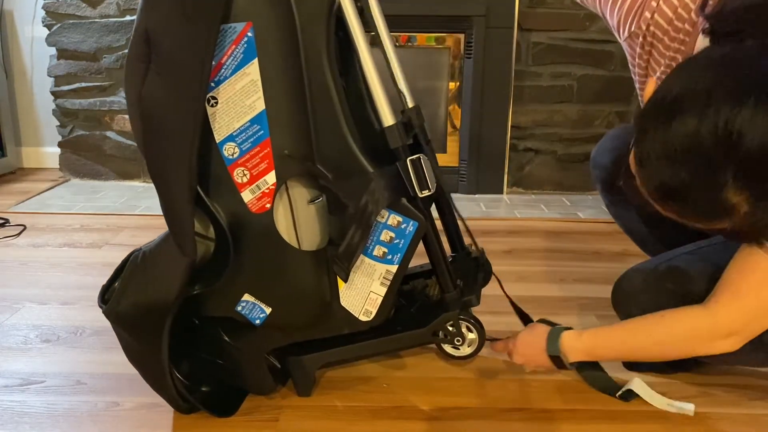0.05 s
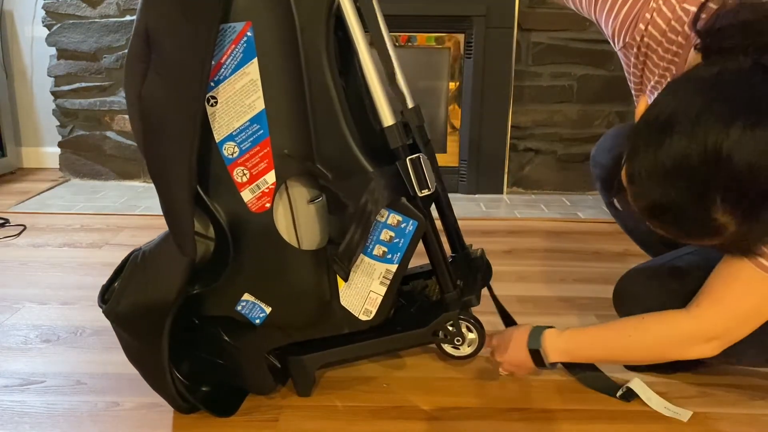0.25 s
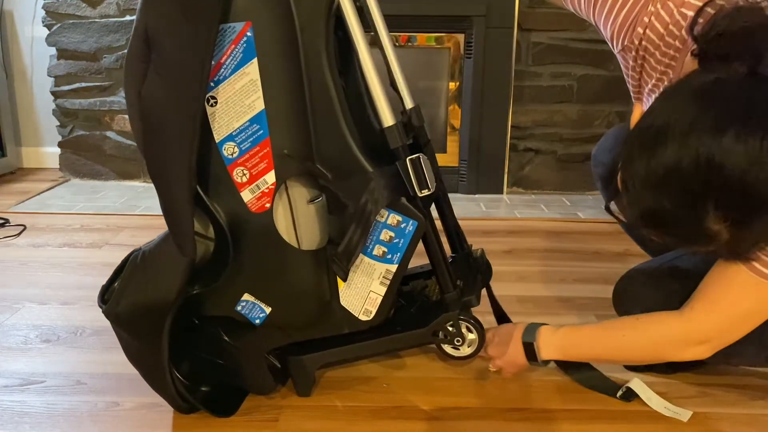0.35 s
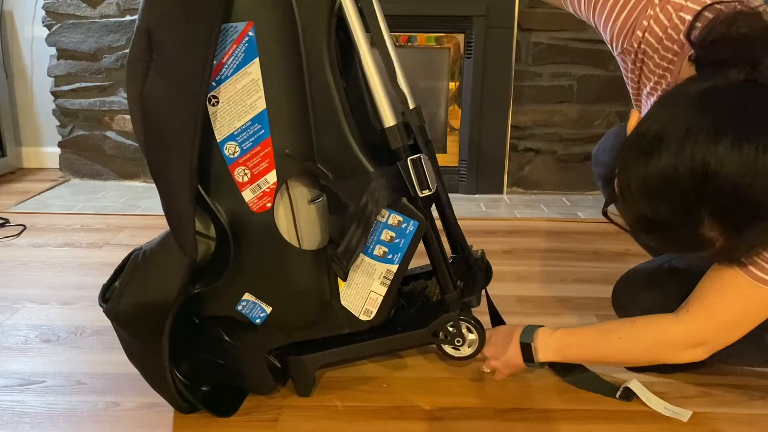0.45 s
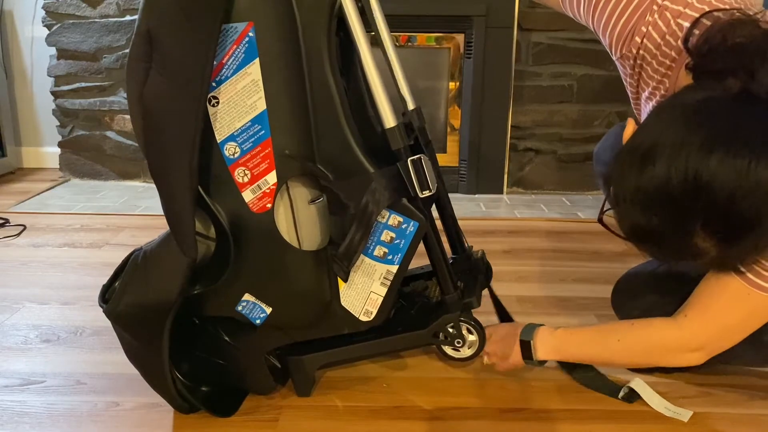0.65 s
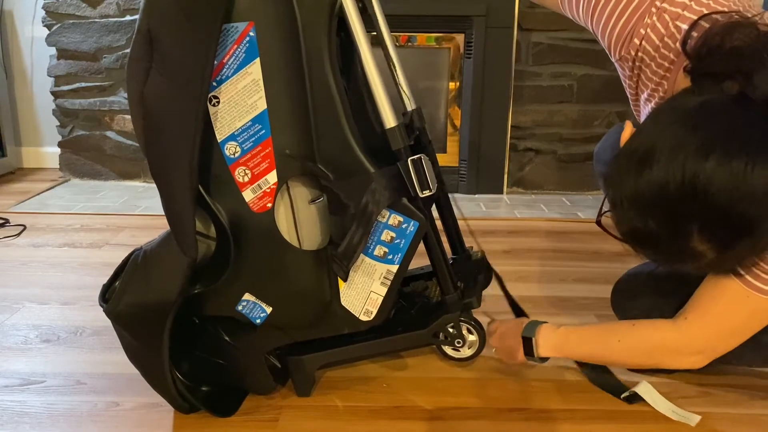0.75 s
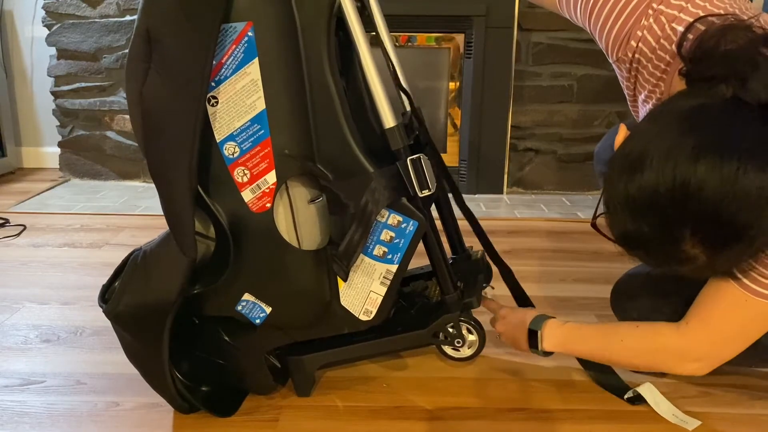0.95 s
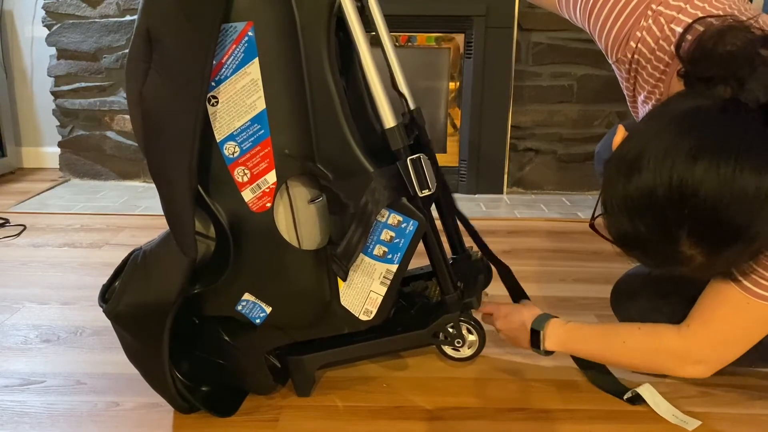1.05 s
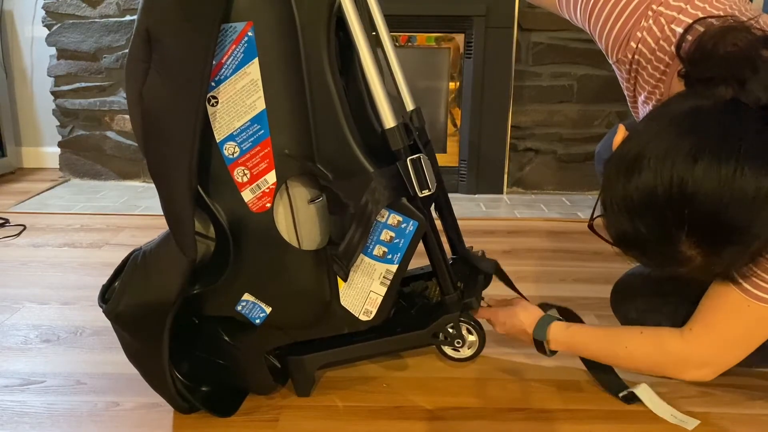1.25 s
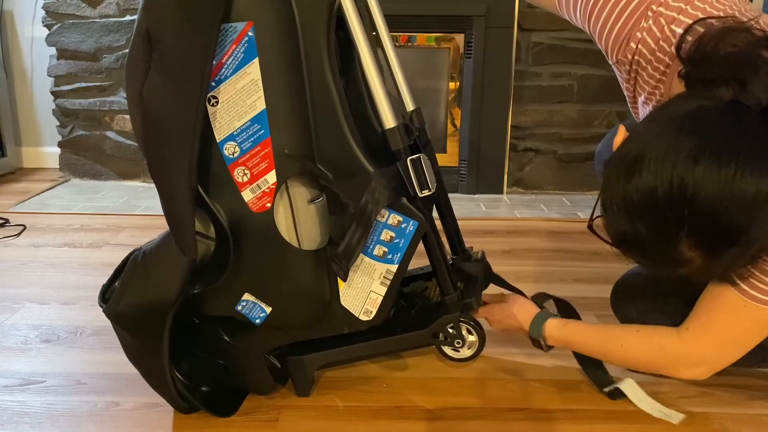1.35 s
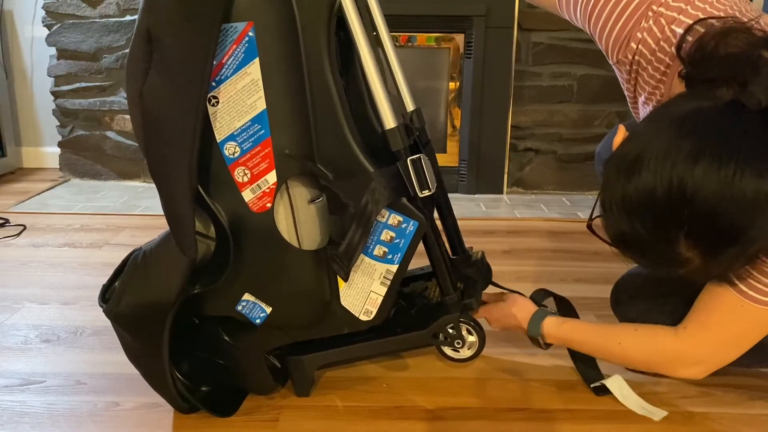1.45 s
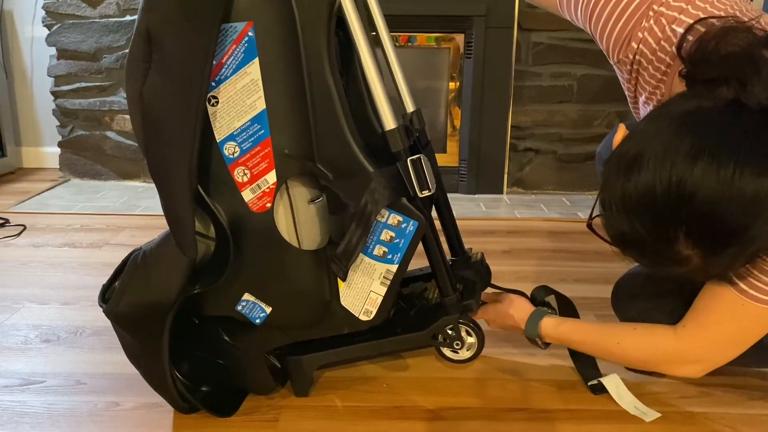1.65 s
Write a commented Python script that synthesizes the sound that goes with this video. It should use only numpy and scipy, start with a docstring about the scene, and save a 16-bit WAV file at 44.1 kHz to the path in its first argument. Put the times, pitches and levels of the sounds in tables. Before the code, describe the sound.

A metal strap connector clicks and knocks on a small cart's axle and frame. A tiny tick at 0.09 s precedes a loud, bright clatter at 0.24-0.29 s; faint strap rustle and a soft tap follow around 0.5, a lighter click at 0.63, weak scrapy ticks at 0.94-1.04, then a firm double clack at 1.24 and 1.28. Wooden-floored room echoes and low rumble linger.

```python
"""A live room with a wooden floor: a metal strap connector is hooked on the axle of a small cart.
The connector clicks brightly and the frame knocks lower, both as struck banks of damped modes; tubes ring on.
The webbing rustles in the hand as grainy noise around a wandering pitch.
Floor and walls answer every contact with echoes and a noise tail; the house rumbles faintly as shaped noise."""
import sys
import numpy as np
from scipy import signal
from scipy.fft import rfft, irfft, next_fast_len
from scipy.io import wavfile
from scipy.ndimage import uniform_filter1d

SR = 44100
rng = np.random.default_rng(int(sys.argv[2]) if len(sys.argv) > 2 else 0)


def attenuation_scalar(level_db):
    """Turn a level in dB into a linear amplitude multiplier (20 dB per decade)."""
    decades = np.asarray(level_db, float) / 20
    return 10 ** decades


def to_wav(sig):
    """Store sig (one row per channel, or 1-D mono) as 16-bit WAV at the path in sys.argv[1].

    Samples outside -1..1 are clipped; the rate is SR.
    """
    pcm = np.clip(np.atleast_2d(sig), -1, 1) * 32767
    pcm = np.round(pcm).astype(np.int16)
    wavfile.write(sys.argv[1], SR, pcm.T)  # frames by channels


N = 74970  # length in samples

# webbing rustle over time: start_s, level_db, centre_hz
RUSTLE_PATH = [(0, -72.5, 5470), (.2, -83.5, 4670), (.45, -64.5, 2390), (.54, -65.5, 2450),
               (.62, -72, 3000), (.75, -77.5, 4000), (.92, -78, 3800), (.945, -68, 3500),
               (.966, -53.5, 3540), (1.07, -117, 5100), (1.2, -80.5, 5000), (1.45, -67, 3000),
               (1.7, -100, 3000)]
# broad skirt under the rustle's hump: pitch_hz, level_db
RUSTLE_SKIRT = [(300, 23), (1000, 19.5), (3000, 11), (6000, -3.5), (10000, -25.5), (15000, -8.5)]
RUSTLE_OCTAVES, RUSTLE_SKIRT_DB = 0.99, -15.5  # the hump is 6 dB down this far from its centre
GRAINS_PER_S, GRAIN_DB = 7600, -2  # mean rate; scale of the random spread in grain level

# steady rumble and hiss of the house: pitch_hz, relative_level_db_per_hz
HOUSE_SPECTRUM = [(24, -10), (40, 0.5), (76, 3), (233, -8), (527, -22.5), (845, -19.5), (1320, -48.5),
                  (1650, -44), (2990, -51), (6300, -49), (15000, -57)]
HOUSE_DB = -62  # rms ahead of the microphone

# connector clicks: start_s, level_db, best_pitch_hz, spread_octaves, room_send_db
CLICK_HITS = [(.0882, -52, 8760, 0.42, -20), (.2386, -34.5, 9000, 0.45, -1.5),
              (.2396, -43, 14000, 0.27, -23), (.2462, -47, 9900, 0.49, 3), (.2548, -35, 13500, 0.54, -13),
              (.2570, -39, 2900, .4, -5.5), (.2390, -28, 5130, 0.4, -4.5), (.2396, -31, 2810, 0.3, -3),
              (.2545, -34, 3300, 0.46, -2), (.2620, -38, 5480, 0.36, 5.5), (.2630, -36, 2580, 0.47, -11),
              (.2920, -42, 2410, 0.11, -4.5), (.5087, -51.5, 2450, 0.07, 3.5),
              (.6310, -37.5, 3980, 0.23, -0.5), (.6302, -43.5, 7100, 0.55, -6.5),
              (.6395, -56, 3900, 0.25, -7), (.6342, -48.5, 3850, 0.3, -2.5), (.9398, -50.5, 3230, 0.7, -4),
              (.9600, -60.5, 3730, 0.57, 1), (.9630, -68, 5500, 1.1, 11.5), (.9665, -57, 2650, 0.77, -22),
              (1.0290, -65, 4620, 0.83, 10), (1.0400, -50, 10800, 0.55, -8.5),
              (1.0405, -51, 4970, 0.16, -1.5), (1.2410, -42.5, 10000, 1, -0.5),
              (1.2406, -31.5, 3150, 0.32, -6), (1.2409, -29, 5110, 0.13, -4), (1.2432, -41, 3380, .4, -6.5),
              (1.2828, -44, 3800, 0.65, 1)]
# frame knocks: start_s, level_db, best_pitch_hz, spread_octaves, room_send_db
KNOCK_HITS = [(.2398, -35.5, 1780, 0.32, -2), (.2430, -31, 1350, 0.36, -6), (.2450, -37.5, 453, 0.75, -7.5),
              (.2585, -33, 1300, 0.59, -1.5), (.2600, -48.5, 193, 0.81, -4.5),
              (.2710, -40.5, 990, 0.23, 0.5), (.2805, -43.5, 1297, .5, -5), (.3300, -60, 350, 0.093, 5),
              (.4950, -46, 477.6, 0.16, 9.5), (.6303, -48, 870, 0.65, -5), (.6345, -46, 1285, 0.65, -1),
              (.6520, -53.5, 595, 0.17, -5), (.9396, -46, 1500, 0.54, -1), (.9413, -50.5, 1590, 0.33, -5.5),
              (.9495, -52.5, 1700, 0.3, -6.5), (.9620, -54.5, 1660, 0.32, -4),
              (1.2420, -42.5, 1450, 0.43, 4), (1.2440, -37, 420, 0.38, -3.5),
              (1.2815, -28.5, 1280, 0.67, -4), (1.2832, -42, 1500, 0.72, -15.5),
              (1.2915, -32, 1260, 0.65, -16.5), (1.2820, -53.5, 200, 0.63, 1)]
# damped modes of the connector: pitch_hz, level_db, t60_s
CONNECTOR_MODES = [(2450, 1, 0.013), (2977, 4, 0.0082), (3396, 0.5, 0.013), (3800, 0, 0.011),
                   (4273, 2.5, 0.0064), (5150, -1.5, 0.01), (5750, 0.5, 0.0045), (6593, 3, 0.0043),
                   (7640, 4, 0.0033), (9520, 7, 0.0017), (12750, -12.5, 0.016), (14700, -15.5, 0.0033)]
# damped modes of the frame: pitch_hz, level_db, t60_s
FRAME_MODES = [(139, -2.5, 0.076), (189, -33.5, 0.1), (285, -8.5, 0.14), (393, -2.5, 0.04),
               (421, -14.5, 0.063), (599, 4.5, 0.025), (769, 3, 0.024), (1022, 8.5, 0.014),
               (1209, 2.5, 0.011), (1646, 6, 0.01), (2166, 6, 0.013), (2307, 12, 0.0077),
               (3000, -3, 0.0062)]
# tubes that ring on after a knock: pitch_hz, level_db, t60_s
TUBE_MODES = [(375, -22, .3), (567, -24, .35), (625, -27, .35), (836, -27, .35), (879, -21, .4),
              (1009, -21, .28), (1044, -28, .4), (1086, -26, .35), (1136, -23, .3), (1215, -28, .3),
              (1595, -26, .35), (1650, -31, .3), (1766, -29, .25), (2180, -30, .25), (2347, -31, .25),
              (2425, -32, .3), (3181, -29, .3)]
MODE_CHANCE_DB = 1.5  # random spread of each mode from hit to hit

# first echoes from floor and furniture: delay_s, left_db, right_db
FIRST_ECHOES = [(.0085, -16, -9), (0.014, -6, -5)]
# dying time of the room: pitch_hz, t60_s
ROOM_DECAY = [(120, 0.42), (250, 0.47), (500, 0.45), (1000, 0.59), (2000, 0.59), (4000, 0.49), (8000, 0.42),
              (14000, 0.28)]
# colour of the room's tail: pitch_hz, level_db
TAIL_COLOUR = [(200, -7.5), (500, 1.4), (1000, -7.5), (2000, -7.5), (4000, -8), (8000, -5), (12000, -8.5),
               (15000, 4.5)]
ECHO_CUT_HZ = 6100  # wood and cloth return little treble
ROOM_DB, ROOM_BUILD_S = -23, 0.00068  # tail gain, time constant of its rise
LATE_DB, LATE_STRETCH = -29, 2.3  # late part: gain against the main tail, times its t60

# likeness of left and right in noise: pitch_hz, correlation
STEREO_LIKENESS = [(40, 0.98), (200, 0.8), (500, 0.056), (1000, 0.04), (2000, 0.17), (4000, 0.2),
                   (7000, 0.16), (10000, 1), (14000, 0.78)]
BAND_EDGES_HZ = 28 * 2 ** np.arange(0, 9.3, 1 / 3)  # third octaves

# colour of the microphone: pitch_hz, level_db
MICROPHONE_COLOUR = [(25, -24.5), (50, 0.3), (11500, 1.18), (12600, -0.5), (14000, 10.5), (15200, 18.5),
                     (16000, -21), (16500, -52)]
# phase by which the left port leads the right: pitch_hz, left_lead_rad
PORT_LEAD = [(100, 0), (6500, -.3), (7600, -1.5), (8500, -3.1), (9500, -4.2), (10400, -6.2), (11700, -6.3),
             (12300, -9.2), (13800, -9.6), (14600, -10.8), (15400, -12.5)]
RIGHT_DB = -0.61  # right port against left


def in_time(rows):
    """Columns of a time table, one value a sample."""
    s, *columns = np.transpose(rows)
    return [np.interp(np.arange(N) / SR, s, column) for column in columns]


def at_hz(points, hz):
    """A spectrum read on a log pitch axis."""
    table_hz, values = np.array(points).T
    return np.interp(np.log(hz), np.log(table_hz), values)


def rms_one(x):
    """Scale to rms 1."""
    return x / np.sqrt(np.mean(x ** 2) + 1e-20)


def bands(white):
    """Third-octave bands of stereo noise with the likeness of their pitch; neighbours use unrelated draws."""
    for k, (low, high) in enumerate(zip(BAND_EDGES_HZ, BAND_EDGES_HZ[1:])):
        band_filter = signal.butter(2, [low, high], "band", fs=SR, output="sos")
        mid, side = signal.sosfilt(band_filter, white[k % 2])
        hz = np.sqrt(low * high)
        alike = np.clip(at_hz(STEREO_LIKENESS, hz), -1, 1)
        yield hz, np.sqrt(1 + alike) * mid + np.sqrt(1 - alike) * side * [[1], [-1]]


def webbing():
    """Noise roughened by dense grains of cloth on metal: a hump wandering in pitch over a broad skirt."""
    db, centre_hz = in_time(RUSTLE_PATH)
    grain_sizes = attenuation_scalar(GRAIN_DB * np.minimum(rng.exponential(1, N), 4))
    grains = (rng.random(N) < GRAINS_PER_S / SR) * grain_sizes
    lumps = rms_one(uniform_filter1d(grains, size=24) + 1e-3)
    white = rng.standard_normal((2, 2, N)) * (.5 + .5 * lumps)
    rustle = np.zeros((2, N))
    for hz, band in bands(white):
        if hz > 250:
            hump = attenuation_scalar(-6 * (np.log2(hz / centre_hz) / RUSTLE_OCTAVES) ** 2)
            skirt = attenuation_scalar(RUSTLE_SKIRT_DB + at_hz(RUSTLE_SKIRT, hz))
            rustle += band * (hump + skirt)
    return attenuation_scalar(db) * rustle


def house():
    """Steady rumble and faint hiss: noise weighted band by band."""
    white = rng.standard_normal((2, 2, N + SR // 4))  # the extra quarter second lets the filters settle
    noise = sum(band[:, -N:] * attenuation_scalar(at_hz(HOUSE_SPECTRUM, hz)) for hz, band in bands(white))
    return attenuation_scalar(HOUSE_DB) * rms_one(noise)


def strike(hits, modes, burst_s):
    """Every hit rings every mode, strongest near its best pitch; rows: direct sound, sound sent to the room."""
    s, db, best_hz, spread, send_db = np.transpose(hits)
    chance = rng.standard_normal((len(s), len(modes)))
    out = np.zeros((2, N))
    for k, (hz, mode_db, t60) in enumerate(modes):
        off_pitch_db = -6 * (np.log2(hz / best_hz) / spread) ** 2
        size = attenuation_scalar(db + mode_db + off_pitch_db + MODE_CHANCE_DB * chance[:, k])
        size = size * (-1) ** k  # neighbouring modes start in opposite directions
        impulses = np.full((2, N), 1e-18)
        np.add.at(impulses, (slice(None), (s * SR).astype(int)), [size, size * attenuation_scalar(send_db)])
        ring_pole = attenuation_scalar(-60 / (t60 * SR))
        burst_pole = ring_pole * np.exp(-1 / (burst_s * SR))
        w = 2 * np.pi * hz / SR
        # a very short burst at the same pitch sharpens the start of the ring
        for gain, pole in ((0.83, ring_pole), (0.39, burst_pole)):
            feedback = [1, -2 * pole * np.cos(w), pole * pole]
            out += gain * signal.lfilter([0, pole * np.sin(w)], feedback, impulses)
    return out


def connector_clicks():
    """Bright contacts: the small metal connector rings in quickly damped high modes."""
    return strike(CLICK_HITS, CONNECTOR_MODES, burst_s=0.000087)


def frame_knocks():
    """Softer, lower contacts: frame modes die soon, tube modes ring on, all held to a softer band."""
    soft = signal.butter(2, [80, 6000], "band", fs=SR, output="sos")
    return signal.sosfilt(soft, strike(KNOCK_HITS, FRAME_MODES + TUBE_MODES, burst_s=.0001))


def room(sent):
    """First echoes, then noise that dies band by band, with a slower late part from the next rooms."""
    t = np.arange(N) / SR
    tail = np.zeros((2, N))
    for hz, band in bands(rng.standard_normal((2, 2, N))):
        if hz > 100:
            fall_db = -60 * t / at_hz(ROOM_DECAY, hz)
            decay = attenuation_scalar(fall_db) + attenuation_scalar(LATE_DB + fall_db / LATE_STRETCH)
            tail += band * attenuation_scalar(at_hz(TAIL_COLOUR, hz)) * decay
    tail = attenuation_scalar(ROOM_DB) * tail * (1 - np.exp(-t / ROOM_BUILD_S))
    echoes = np.full((2, N), 1e-18)
    for s, left_db, right_db in FIRST_ECHOES:
        echoes[:, int(s * SR)] = attenuation_scalar(np.array([left_db, right_db]))
    dull = signal.butter(2, ECHO_CUT_HZ, fs=SR, output="sos")
    response = tail + signal.sosfilt(dull, echoes)
    return signal.fftconvolve(sent[None], response, axes=1)[:, :N]


def scene():
    """Rustle, rumble, contacts and the room that answers them."""
    direct, sent = connector_clicks() + frame_knocks()
    return webbing() + house() + direct + room(sent)


def band_limit(x):
    """A steep low-pass at the top of the band."""
    return signal.sosfilt(signal.butter(12, 16580, fs=SR, output="sos"), x)


def record(dry):
    """Two coloured microphone ports that fall out of phase in parts of the treble."""
    size = next_fast_len(N + 4096)
    hz = np.maximum(np.arange(size // 2 + 1) * SR / size, 1)
    left = np.ones(len(hz))
    right = attenuation_scalar(RIGHT_DB) * np.exp(-1j * at_hz(PORT_LEAD, hz))
    ports = attenuation_scalar(at_hz(MICROPHONE_COLOUR, hz)) * np.array([left, right])
    mix = irfft(rfft(dry, size) * ports, size)[:, :N]
    return band_limit(mix)


dry = scene()
out = record(dry)
to_wav(out)
```